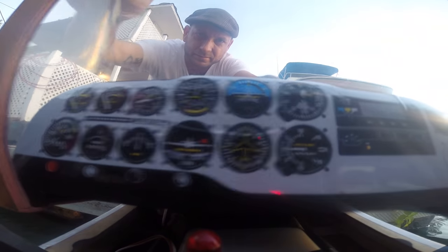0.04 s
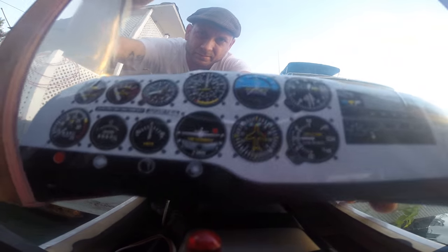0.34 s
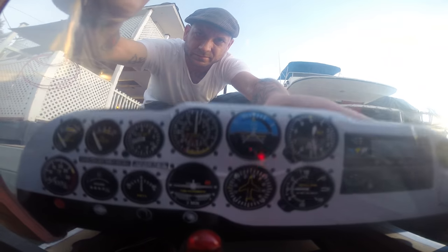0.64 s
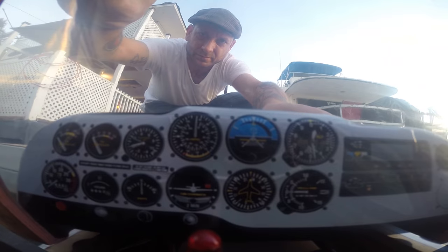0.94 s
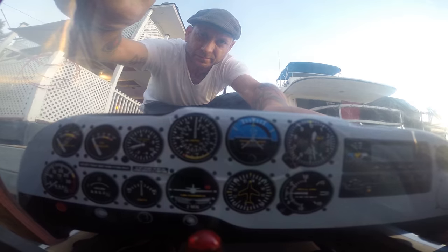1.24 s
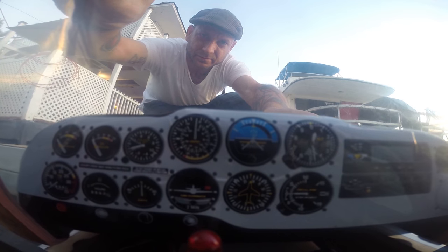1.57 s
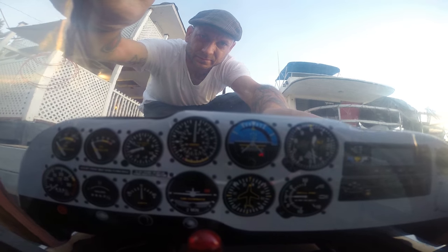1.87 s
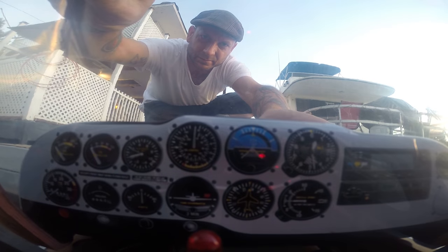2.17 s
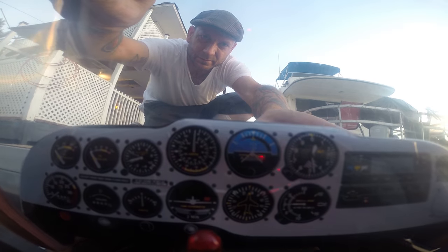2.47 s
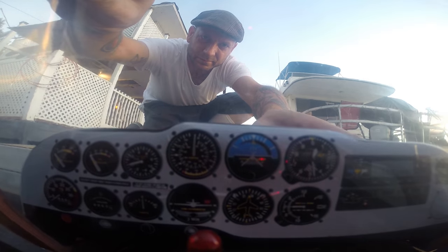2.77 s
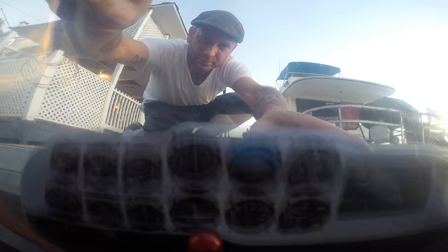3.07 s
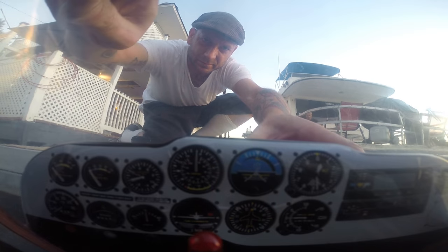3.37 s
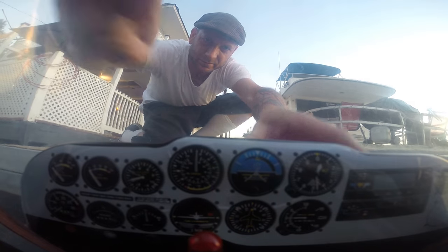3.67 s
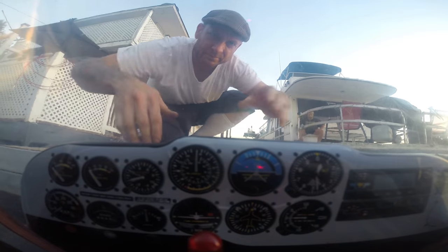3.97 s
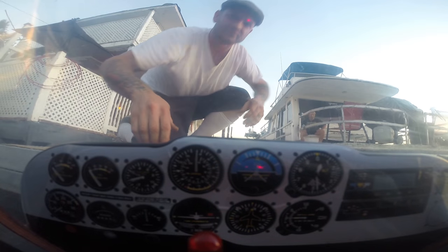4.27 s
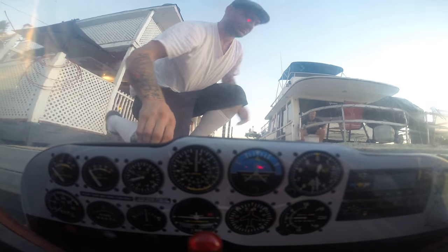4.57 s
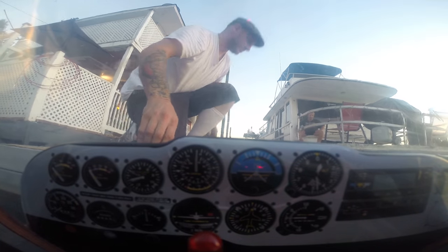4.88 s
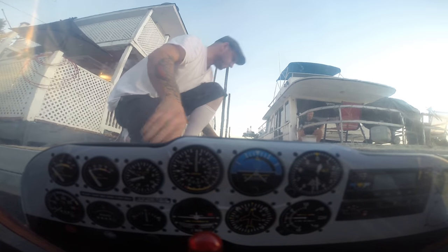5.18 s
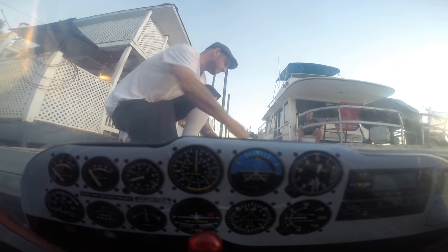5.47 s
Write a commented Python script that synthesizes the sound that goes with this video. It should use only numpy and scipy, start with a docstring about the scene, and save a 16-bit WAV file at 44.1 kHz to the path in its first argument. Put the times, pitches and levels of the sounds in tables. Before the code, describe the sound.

Hands rub and tap a hollow model plane, then its canopy snaps shut with one loud knock, over faint hiss and low throb.

```python
"""Hands rub, tap and rock a model plane outdoors, heard close up from a small camera in its cockpit.
Skin slips on the hollow shell and pushes make the airframe thud and shiver. At 3.2 s the canopy
snaps shut with one loud knock that rings the shell. The plane sways on its landing gear throughout,
a low throb. Underneath lie the camera's hiss, whine and faint electronic buzz; its gain control
ducks everything at the knock and creeps back up."""
import sys
import numpy as np
from scipy import signal
from scipy.fft import rfft, irfft
from scipy.io import wavfile
from scipy.ndimage import uniform_filter1d, minimum_filter1d

SR = 44100
rng = np.random.default_rng(int(sys.argv[2]) if len(sys.argv) > 2 else 0)


def bounce(signal):
    """Save signal as a 16-bit WAV file at the path given by the first command-line argument."""
    frames = np.transpose(np.atleast_2d(signal))
    limited = np.clip(frames, -1, 1)
    pcm = np.round(limited * 32767).astype(np.int16)
    wavfile.write(sys.argv[1], SR, pcm)


N = 247842
TIME = np.arange(N) / SR


# contacts of the canopy as it snaps shut: t/s, level/dB, low-pass f/Hz
CANOPY_HITS = [(3.177, 1, 480), (3.1829, -3, 12000), (3.1835, 5, 2000), (3.1904, 18, 7540),
               (3.1914, -6, 6800)]

def canopy(shell):
    """The canopy touches, catches and slams home; each contact rings the shell, dull or bright."""
    out = np.zeros(N)
    for s, db, cutoff_hz in CANOPY_HITS:
        lowpass = signal.butter(1, cutoff_hz, fs=SR)
        add(out, s, amp(db) * signal.lfilter(*lowpass, shell))
    return out


# body of the knock, the hollow shell's modes: f/Hz, level/dB, t60/s
SHELL_MODES = [(350, -23.5, 0.099), (381, -34.5, 0.18), (480, -24, 0.046), (631, -26, .085),
               (746, -47.5, .2), (923, -32.5, 0.057), (945, -25, 0.064), (1065, -19.5, 0.041),
               (1122, -21, .04), (1346, -16.5, .045), (1572, -13.5, 0.058), (1643, -10, 0.04),
               (1805, -28, .1), (1844, -51, 0.38), (1880, -30.5, 0.06), (2090, -31, 0.074),
               (2340, -33.5, 0.043), (2630, -15.5, 0.029), (2844, -21.5, 0.047), (3100, -16.5, .035),
               (3340, -23, .045), (3900, -17, 0.028), (4030, -12.5, 0.016), (4400, -20.5, 0.021),
               (4440, -28.5, 0.028), (5560, -18.5, 0.013), (6100, -29, 0.054), (6320, -30, 0.046),
               (7040, -36, 0.071)]
# attack, the crack of a hard contact: f/Hz, relative level/dB
CRACK_EQ = [(100, -22), (400, -10.5), (1000, -2.5), (1600, 4), (2200, -8.5), (4000, -10.5), (5000, -21),
            (6500, -13), (8000, -32), (11000, -27), (16000, -41)]
# tail, the cockpit's dense ringing: f/Hz, relative level/dB
RING_EQ = [(100, 4.5), (400, -2.5), (1000, -7.5), (1700, -1.5), (2600, -9.5), (4500, -17), (6500, -15),
           (8500, -28.5), (16000, -36.5)]
# decay of that tail: f/Hz, t60/s
RING_DECAY = [(200, 0.16), (600, 0.26), (1500, 0.15), (3000, 0.14), (6000, 0.1), (12000, 0.1)]

def shell_response(crack_db=-10, crack_t60=0.039, ring_db=-29):
    """One hard blow on the shell: a short crack, its modes, and ringing whose treble dies first."""
    t = TIME[:SR // 2]
    crack = colour(rng.standard_normal(len(t)), CRACK_EQ) * amp(crack_db - 60 * t / crack_t60)
    wash = colour(rng.standard_normal(len(t)), RING_EQ)
    hz, when, bands = signal.stft(wash, SR, nperseg=256)
    decay = amp(-60 * when / read(RING_DECAY, hz)[:, None])
    ring = signal.istft(bands * decay, SR)[1][:len(t)]
    return modes(SHELL_MODES, t) + crack + amp(ring_db) * ring


# bending modes of fuselage and wings: f/Hz, level/dB, t60/s
FRAME_MODES = [(83, -19.5, 0.15), (90.4, -24, 0.68), (128, -11.5, .11), (185.5, 8.5, 0.026),
               (200.1, -1, 0.13), (214, -30, 0.7), (236.5, -4, 0.071)]
# pushes on the airframe, the hardest under the canopy's knock: t/s, level/dB
PUSHES = [(0.017, -26.5), (0.08, -27), (0.127, -18), (0.173, -24.5), (.313, -19), (.344, -17),
          (0.389, -28.5), (0.466, -20), (0.512, -18), (0.593, -24), (0.658, -29), (0.725, -23.5),
          (0.761, -24.5), (0.862, -26.5), (1.468, -37.5), (1.622, -43), (1.875, -41), (3.1827, 8.5),
          (3.684, -25.5), (4.348, -32.5), (4.792, -32), (4.999, -39), (5.089, -42)]

def thuds(attack_s=0.0003):
    """Blunt pushes set the whole airframe bending."""
    out, t = np.zeros(N), TIME[:SR]
    bend = -modes(FRAME_MODES, t) * (1 - np.exp(-t / attack_s)) ** 2
    for s, db in PUSHES:
        add(out, s, amp(db) * bend)
    return out


# low rumble of the shivering airframe: f/Hz, relative level/dB
TREMBLE_EQ = [(30, -15), (60, -0.5), (92, 4), (112, -9), (135, 4.5), (160, -2.5), (195, 0), (240, -14),
              (300, -32), (400, -23), (600, -62.5)]

def trembling(send_db=-12.5, knee_db=-3.5, attack_s=0.0014, fade_db_per_s=74, resting_db=-58.5):
    """The airframe shivers on after every thud, and faintly under resting hands."""
    power = np.full(N, amp(resting_db) ** 2)
    shiver = (1 - np.exp(-TIME / attack_s)) * amp(-fade_db_per_s * TIME)
    for s, db in PUSHES:
        kick = amp(send_db + db) / (1 + amp(db - knee_db))  # saturates for hard blows
        add(power, s, (kick * shiver) ** 2)
    return colour(rng.standard_normal(N), TREMBLE_EQ) * np.sqrt(power)


# fingertips and nails tapping the plane: t/s, level/dB, centre f/Hz, spread/octaves
FINGER_TAPS = [(0.017, -38, 1330, .7), (0.1733, -37, 1200, .4), (.294, -48.5, 3570, 0.64),
               (.331, -39.5, 4250, .49), (0.3314, -31, 1815, .19), (.461, -48, 1480, .5),
               (.4932, -50, 2300, 1.2), (.51, -42.5, 2200, 1.1), (.973, -42.5, 1490, .14),
               (3.161, -47, 1300, 1), (3.339, -50, 3600, .5), (3.344, -40.5, 1380, .28),
               (3.721, -49, 1428, .54), (4.344, -47, 450, 0.93), (4.784, -48, 1700, .8)]
# the grip slipping, creaky where narrow: t/s, level/dB, centre f/Hz, spread/octaves
FINGER_SLIPS = [(.121, -50.5, 2000, 1.24), (.175, -40.5, 446, 0.65), (.337, -35, 1270, 0.74),
                (.339, -32.5, 377, .12), (.344, -34.5, 944, 0.066), (.389, -53.5, 1950, 1.4),
                (.736, -40, 2500, 0.46), (.86, -44, 2540, 0.33)]

def fingers(shell, tap_attack_s=0.0013, slip_attack_s=0.005):
    """Fingers on the shell: taps start quickly; slips swell and last a little longer."""
    out = np.zeros(N)
    for touches, attack_s in (FINGER_TAPS, tap_attack_s), (FINGER_SLIPS, slip_attack_s):
        for s, db, centre_hz, octaves in touches:
            add(out, s, amp(db) * touch(shell, centre_hz, octaves, attack_s))
    return out


def touch(shell, centre_hz, octaves, attack_s, shell_send=0.3):
    """A short burst of friction that partly rings the shell; its loudest 5 ms have rms 1."""
    t = TIME[:SR // 4]
    hz = np.fft.rfftfreq(len(t), 1 / SR) + 1
    band = np.exp(-0.5 * abs(np.log2(hz / centre_hz) / octaves) ** 3) / np.sqrt(hz)
    friction = irfft(rfft(rng.standard_normal(len(t))) * band, len(t))
    burst = friction * t / attack_s * np.exp(-t / attack_s)
    ring = signal.fftconvolve(burst, shell)[:len(t)]
    sound = unit(burst) + shell_send * unit(ring)
    return sound / np.sqrt(uniform_filter1d(sound ** 2, size=220).max())


# palm strokes along the plane: t/s, length/s, level/dB
PALM_STROKES = [(0, 0.11, -53), (0.108, 0.09, -49), (0.269, 0.2, -46.5), (0.459, 0.16, -50.5),
                (0.569, 0.12, -51), (0.7, 0.071, -50.5), (0.75, 0.29, -62), (3.646, 0.089, -52.5)]
# rasp of rubbing skin: f/Hz, relative level/dB
RUB_EQ = [(200, -6), (500, 6), (1000, 0), (1900, 3.5), (3000, -8.5), (3800, -7.5), (7000, -23.5),
          (12000, -42)]
# low judder of a dragging palm: f/Hz, relative level/dB
JUDDER_EQ = [(30, -20), (60, -5), (90, 3), (125, 3.5), (165, -12), (300, -39), (600, -80)]

def palms(grain_db=3, judder_db=14, skew=0.59, sharpness=2.7):
    """Sliding skin: a stream of tiny uneven slips, as loud as the stroke is fast, over a low judder."""
    speed = np.zeros(N)
    for s, length, db in PALM_STROKES:
        progress = np.linspace(0, 1, round(length * SR))
        swell = abs(np.sin(np.pi * progress ** skew)) ** sharpness  # quick in, gentle out
        add(speed, s, amp(db) * swell)
    slips = rng.standard_normal(N) * amp(grain_db * drift(size=150))
    judder = colour(rng.standard_normal(N), JUDDER_EQ) * uniform_filter1d(speed, size=8000)
    return colour(slips, RUB_EQ) * speed + amp(judder_db) * judder


# nudges that set the plane swaying: t/s, level/dB, hold/s, time until caught/s
SWAY_NUDGES = [(0, -34, .01, .1), (0.059, -27, 0.0083, 0.48), (.47, -21, 0.0056, 1.05),
               (1.44, -34.5, 0.0061, 0.46), (2.014, -36, .12, 1.1), (3.17, -33.5, 0.17, 0.4),
               (3.78, -50, 0.15, 0.37), (4.31, -42.5, 0.55, 0.91), (5.01, -35, 0.054, 0.55)]

def rocking(sway_hz=32.6, attack_s=0.056, free_db_per_s=33, hand_db_per_s=199):
    """The plane bobs on its springy gear: each nudge builds, holds and fades until a hand damps it."""
    swing = np.zeros(N)
    for s, db, hold_s, caught_s in SWAY_NUDGES:
        t = np.maximum(TIME - s, 0)
        build_up = np.sin(np.pi / 2 * np.minimum(t / attack_s, 1)) ** 2
        fade_db = free_db_per_s * np.maximum(t - attack_s - hold_s, 0)
        damping_db = hand_db_per_s * np.maximum(t - caught_s, 0)
        swing = np.maximum(swing, build_up * amp(db - fade_db - damping_db))
    pitch_hz = sway_hz * (1 + 0.03 * drift(size=8000))
    wobble_db = 1.6 * drift(size=4000)
    return tone(pitch_hz) * swing * amp(wobble_db)


# the camera's noise floor: f/Hz, relative level/dB
HISS_EQ = [(30, 7), (200, 5), (330, 2), (700, -3), (1500, -6), (2700, -10.5), (4000, -12.5), (5800, -15.5),
           (7500, -21), (10000, -25), (11500, -23), (13000, -33.5), (15500, -30)]
# thin whistles of its electronics: f/Hz, level/dB, waver/Hz
WHINE_TONES = [(2560, -75, 0.87), (5850, -102.5, 25), (8765, -79, 8.3), (11690, -81, 16), (14626, -84, 4)]
# ring of each buzz pulse: f/Hz, level/dB, t60/s
BUZZ_MODES = [(2150, -51.5, .009), (2609, -55.5, 0.028), (2830, -49.5, 0.0047), (3620, -61.5, 0.014)]

def electronics(hiss_db=-58, buzz_hz=36.77):
    """The camera's own bed: even hiss, wavering whistles and a fast train of faint pulses."""
    hiss = amp(hiss_db) * colour(rng.standard_normal(N), HISS_EQ)
    whine = sum(amp(db) * tone(hz + waver_hz * drift(size=900)) for hz, db, waver_hz in WHINE_TONES)
    since_pulse = (TIME * buzz_hz + 0.6) % 1 / buzz_hz
    return hiss + whine + modes(BUZZ_MODES, since_pulse)


def amp(db):
    """Decibels to gain."""
    return 10 ** (np.asarray(db) / 20)


def unit(x):
    """Scales to rms 1."""
    return x / np.sqrt(np.mean(x ** 2) + 1e-20)


def read(points, hz):
    """Reads a table along a log-frequency axis."""
    f, value = np.transpose(points)
    return np.interp(np.log(hz + 1), np.log(f + 1), value)


def add(mix, s, sound):
    """Mixes a sound in at s seconds."""
    part = mix[round(s * SR):][:len(sound)]
    part += sound[:len(part)]


def colour(x, eq):
    """Shapes x with an EQ curve, at rms 1."""
    hz = np.fft.rfftfreq(len(x), 1 / SR)
    return unit(irfft(rfft(x) * amp(read(eq, hz)), len(x)))


def modes(table, t):
    """Damped sines after a blow; neighbouring modes swing in opposite directions."""
    return sum((-1) ** k * amp(db - 60 * t / t60) * np.sin(2 * np.pi * hz * t)
               for k, (hz, db, t60) in enumerate(table))


def drift(size):
    """Random modulation of rms 1, smoothed over size samples."""
    return unit(uniform_filter1d(rng.standard_normal(N), size=size))


def tone(hz):
    """A sine of rms 1 that follows a pitch curve."""
    return unit(np.sin(2 * np.pi * np.cumsum(hz) / SR))


def scene():
    """A close mono mix; canopy and fingers ring the same shell."""
    shell = shell_response()
    plane = canopy(shell) + thuds() + fingers(shell) + palms() + rocking() + trembling()
    return (plane + electronics())[None]


def record(dry, threshold_db=-8.0, recovery_per_s=5.19, cutoff_hz=15500):
    """Look-ahead gain control ducks for the knock and creeps back; the peak clips; then a low-pass."""
    level = np.sqrt(abs(uniform_filter1d(dry[0] ** 2, size=300)))
    peak_nearby = -minimum_filter1d(-level, size=800)
    excess = peak_nearby / amp(threshold_db)
    release = recovery_per_s * TIME
    held = np.maximum.accumulate(excess + release) - release  # jumps up, sinks linearly
    duck = uniform_filter1d(np.maximum(held, 1), size=100)
    clipped = np.clip(dry / duck, -1, 1)
    lowpass = signal.firwin(511, cutoff_hz, window=("kaiser", 9), fs=SR)
    return signal.oaconvolve(clipped, lowpass[None], "same")


dry = scene()
out = record(dry)
bounce(out)
```